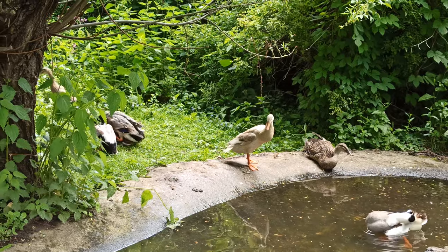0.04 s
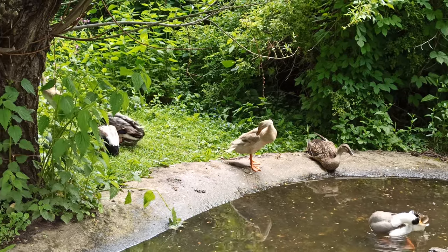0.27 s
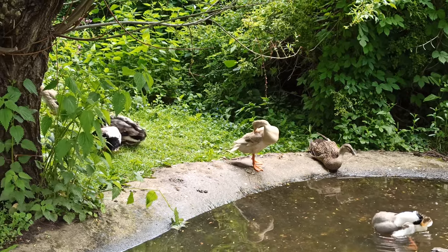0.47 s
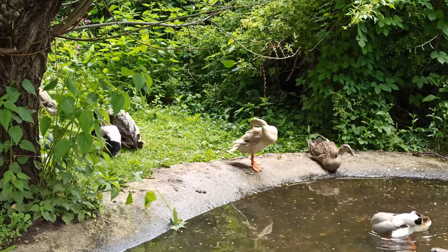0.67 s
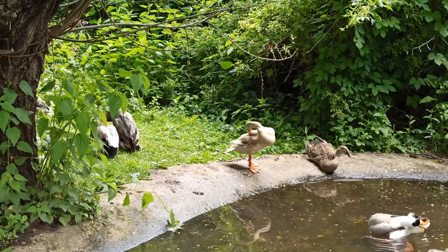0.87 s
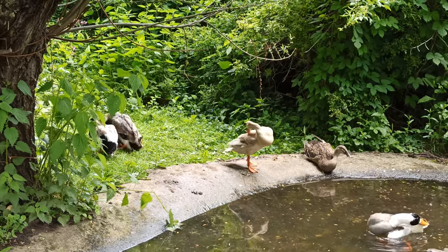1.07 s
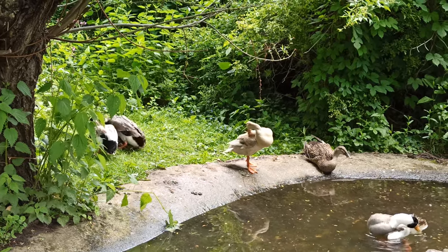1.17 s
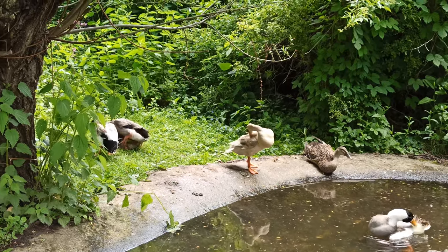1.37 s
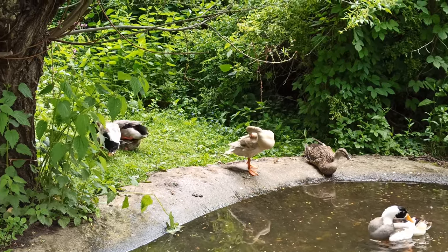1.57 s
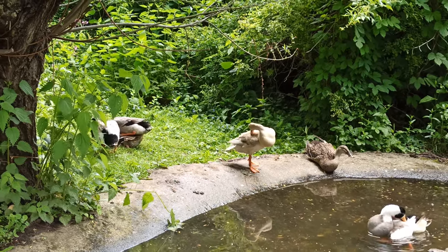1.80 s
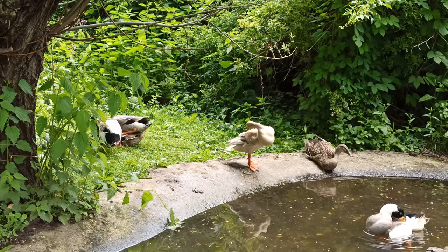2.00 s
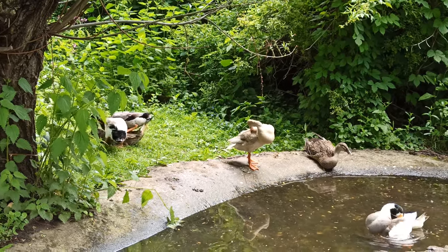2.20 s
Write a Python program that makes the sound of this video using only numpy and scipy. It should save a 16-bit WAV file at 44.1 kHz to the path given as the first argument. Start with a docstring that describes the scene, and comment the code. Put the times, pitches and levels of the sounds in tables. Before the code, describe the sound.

A duck gives one loud, nasal quack by a pond while small birds whistle thinly.

```python
"""A duck beside a garden pond gives one loud quack and three soft clucks: pulses ring throat and bill resonances.
The quack opens from a low rattle into a nasal blare; another duck is heard only through the bushes.
Small birds whistle and chirp as wavering sine tones; water ticks, as ducks preen, are bursts of narrow noise.
Puffs of air push the left microphone port, foliage, ground and trees echo the duck as diffuse noise tails,
and filtered noise makes the quiet outdoor background."""
import sys
import numpy as np
from scipy import signal
from scipy.fft import rfft, irfft, next_fast_len
from scipy.io import wavfile
from scipy.ndimage import map_coordinates

SR = 44100
rng = np.random.default_rng(int(sys.argv[2]) if len(sys.argv) > 2 else 0)


def put_to_file(sound):
    """Save the sound as 16-bit audio at rate SR, in the file named by the first command-line argument."""
    columns = np.atleast_2d(sound).T  # one column per channel
    safe = np.clip(columns, -1, 1)
    whole_steps = np.round(safe * 32767)
    wavfile.write(sys.argv[1], SR, whole_steps.astype(np.int16))


N = 99225
NEAR_T60_S = 0.16  # decay of the echo from close by


def amp(db):
    """Decibels to gain."""
    return 10 ** (np.asarray(db) / 20)


def unit(x):
    """Scale to rms 1."""
    return x / np.sqrt(np.mean(x ** 2) + 1e-20)


def clock():
    """Time of each sample in seconds."""
    return np.arange(N) / SR


def along(points, hz):
    """Read (Hz, value) points on a logarithmic frequency axis."""
    point_hz, value = np.transpose(points)
    return np.interp(np.log(hz + 1), np.log(point_hz + 1), value)


def curves(rows):
    """One value per sample for each column after the time."""
    time_s, *columns = np.transpose(rows)
    return [np.interp(clock(), time_s, column) for column in columns]


def wobble(rate):
    """A smooth random curve, rate knots a second."""
    knots = rng.standard_normal(int(N * rate / SR) + 4)
    return map_coordinates(knots, [clock() * rate])


def filtered(x, response):
    """Multiply the spectrum of x by a complex response of frequency."""
    size = next_fast_len(N + SR // 2)
    hz = np.fft.rfftfreq(size, 1 / SR)
    return irfft(rfft(x, size) * response(hz), size)[..., :N]


def noise(spectrum):
    """Coloured noise of rms 1."""
    return unit(filtered(rng.standard_normal(N), lambda hz: amp(along(spectrum, hz))))


def panned(x, db):
    """Stereo with a left-right level difference."""
    return x * amp(np.array([[db], [-db]]) / 2)


def throat(x, spectrum, size=2048):
    """Ring x through a causal minimum-phase filter of unit energy."""
    log_gain = np.log(amp(along(spectrum, np.fft.rfftfreq(size, 1 / SR))))
    cepstrum = irfft(log_gain)
    cepstrum[1:size // 2] *= 2  # fold the backward half forward in time
    cepstrum[size // 2 + 1:] = 0
    ring = irfft(np.exp(rfft(cepstrum)))
    return signal.fftconvolve(x, ring / np.linalg.norm(ring))[:N]


def pulses(cycles, rough):
    """One pulse per whole cycle, rms near 1; roughness scatters them and accents every third."""
    scatter_db, accent_db, jitter_s = 0.9, 8.5, 0.00013  # each at roughness 1
    at = np.flatnonzero(np.diff(np.floor(cycles)) > 0)
    chance = rng.standard_normal((len(at), 2))
    third = np.resize([1, 0, 0], len(at))
    uneven_db = scatter_db * chance[:, 0] + accent_db * (third - third.mean())
    size = amp(rough[at] * uneven_db) / np.sqrt(np.diff(cycles)[at])  # equal power at any rate
    shifted = np.round(at + jitter_s * SR * rough[at] * chance[:, 1])
    return np.bincount(np.clip(shifted, 0, N - 1).astype(int), size, N)


def echo(x, t60s):
    """A diffuse stereo tail, 4 ms late, in which each frequency dies at its own speed."""
    hz, t, grains = signal.stft(rng.standard_normal((2, SR)), SR, nperseg=256)
    fading = grains * amp(-60 * t / along(t60s, hz)[:, None])
    tail = signal.istft(fading, SR, nperseg=256)[1]
    late = np.pad(np.atleast_2d(x), ((0, 0), (SR // 250, 0)))
    return signal.fftconvolve(late, tail / np.linalg.norm(tail[0]), axes=1)[:, :N]


def background(pan_db=-0.5, hiss_db=-65.5, hiss_pan_db=-7):
    """A low outdoor rush of air and leaves that eases a little, with thin hiss on top."""
    # colour of the rush: pitch_hz, relative_db
    air_colour = [(15, -64), (25, -18), (108, 3), (198, -6), (431, -11), (550, -15), (832, -12.5),
                  (1010, -19.5), (3020, -26), (3950, -23.5), (5200, -31), (8400, -24), (18500, -120)]
    # how alike the two ports hear it: pitch_hz, likeness (1 the same, 0 unrelated)
    air_likeness = [(60, 1), (400, 0.41), (5000, 0.028)]
    # level of the rush: time_s, level_db
    air_level = [(0, -47), (1.6, -51.5)]
    spread = lambda hz: np.arccos(np.clip(along(air_likeness, hz), -1, 1)) / 2
    mid, side = filtered(
        np.array([noise(air_colour), noise(air_colour)]),
        lambda hz: np.array([np.cos(spread(hz)), np.sin(spread(hz))]))
    air = unit(np.array([mid + side, mid - side])) * amp(curves(air_level)[0])
    hiss = amp(hiss_db) * rng.standard_normal((2, N))
    return panned(air, pan_db) + panned(hiss, hiss_pan_db)


def puffs():
    """Each puff of air is one low push on the left port alone; weaker puffs are duller."""
    # puffs before the low cut: centre_s, peak_db
    puff_times = [(0.576, -31), (.601, -33), (0.645, -24.5), (0.665, -30.5), (.686, -26), (1.3, -28),
                  (1.363, -31.5), (1.649, -31), (1.681, -28), (1.774, -21), (1.946, -32.5), (1.984, -26.5),
                  (2.036, -30.5)]
    full_scale_hz, hz_per_db, width_cycles = 193.6, 3.5, 0.53
    t, left = clock(), np.zeros(N)
    for centre_s, db in puff_times:
        cycles = (t - centre_s) * (full_scale_hz + hz_per_db * db)
        push = np.exp(-(cycles / width_cycles) ** 2) * np.cos(2 * np.pi * cycles)
        left -= amp(db) * push
    return np.array([left, np.zeros(N)])


def water(tick_width=0.21, splash_width=0.2, pan_db=-3, wet_db=-10):
    """Sharp ticks and small splashes: bursts of narrow noise that die away exponentially."""
    # water ticks: start_s, level_db, pitch_hz, t60_s
    tick_rows = [(.16, -29.5, 8570, 0.0076), (1.083, -46, 6700, 0.0096), (1.492, -53, 12000, .006),
                 (1.792, -60, 13600, .11)]
    # small splashes: start_s, level_db, pitch_hz
    splash_rows = [(1.794, -54.5, 2240), (1.81, -57.5, 2460), (1.882, -59, 2820)]
    splash_t60_s = 0.13

    def burst(start_s, db, hz, t60_s, width):
        """Noise in a bell-shaped band, its width in natural-log frequency."""
        age = clock() - start_s
        band = lambda f: np.exp(-(np.log((f + 1) / hz) / width) ** 2)
        ring = unit(filtered(rng.standard_normal(N), band))
        return ring * (age > 0) * amp(db) * np.exp(-np.log(1000) * abs(age) / t60_s)

    ticks = sum(burst(*row, tick_width) for row in tick_rows)
    splashes = sum(burst(*row, splash_t60_s, splash_width) for row in splash_rows)
    out = ticks + splashes
    return panned(out + amp(wet_db) * echo(out, [(4000, 0.75)]), pan_db)


def chirps(wet_db=-3, waver=0.0375, flutter_db=3):
    """A second bird repeats one short arched note, a sine of unsteady pitch and level."""
    # the chirps: start_s, level_db, left_minus_right_db
    chirp_times = [(0.979, -46, -5.5), (1.968, -52.5, -8.5)]
    # the arch of one chirp: age_s, pitch_hz, relative_db
    chirp_arch = [(0, 3500, -12), (.006, 4040, -2.5), (.019, 4450, -8), (.026, 3800, -1.5),
                  (.034, 3630, -6.5), (.043, 2950, -20), (.052, 3250, -7), (.07, 3340, -13)]
    t, out = clock(), np.zeros((2, N))
    age_s, pitch_hz, shape_db = np.transpose(chirp_arch)
    for start_s, db, pan_db in chirp_times:
        hz = np.interp(t - start_s, age_s, pitch_hz) * (1 + waver * wobble(400))
        level_db = db + np.interp(t - start_s, age_s, shape_db) + flutter_db * wobble(250)
        sounding = (t > start_s) * (t < start_s + age_s[-1])
        tone = np.sin(2 * np.pi * np.cumsum(hz) / SR)
        out += panned(amp(level_db) * sounding * tone, pan_db)
    return out + amp(wet_db) * echo(out, [(4000, 0.37)])


def whistles(waver=0.012, flutter_db=3, pan_db=-1.5):
    """Wavering sine notes, most of them very high and falling, scattered by the leaves; one faint rising note
    belongs to the distant duck."""
    # thin whistles, plus one faint rising note of the distant duck at 1.445 s, before scattering: start_s,
    # length_s, first_hz, last_hz, level_db
    whistle_notes = [(0.173, 0.081, 7300, 6850, -47.5), (0.221, 0.069, 8310, 7560, -50.5),
                     (.32, 0.14, 6840, 6800, -42.5), (0.405, 0.019, 8240, 7600, -50),
                     (0.409, .075, 7650, 7280, -39), (0.399, 0.05, 6510, 6205, -39.5),
                     (0.472, 0.062, 6940, 6410, -50), (0.594, 0.064, 8390, 6180, -48),
                     (0.597, 0.054, 6780, 5640, -48.5), (0.613, .026, 7570, 7400, -44.5),
                     (0.635, .035, 6850, 6340, -47.5), (.64, 0.073, 1420, 1414, -54),
                     (1.445, 0.076, 2580, 2810, -71), (1.562, 0.075, 3110, 3090, -71),
                     (1.485, 0.18, 8370, 7230, -62.5), (1.5, 0.11, 7310, 6520, -58),
                     (1.679, 0.11, 8100, 7240, -59), (1.694, 0.093, 6980, 6250, -54),
                     (1.847, 0.079, 7950, 7150, -60), (1.855, .065, 7080, 6250, -56)]
    # echo of the whistles, later notes coming from deeper in the bushes: time_s, echo_db
    whistle_depth = [(.6, -7), (1.5, 4)]
    t, out = clock(), np.zeros(N)
    for start_s, length_s, first_hz, last_hz, db in whistle_notes:
        progress = np.clip((t - start_s) / length_s, 0, 1)
        hz = (first_hz + (last_hz - first_hz) * progress) * (1 + waver * wobble(350))
        swell = np.sqrt(abs(np.sin(np.pi * progress)))
        level = amp(db + flutter_db * wobble(110)) * swell
        out += level * np.sin(2 * np.pi * np.cumsum(hz) / SR)
    scattered = (out + echo(out, [(7000, NEAR_T60_S / 2)])) / np.sqrt(2)
    deep = echo(out * amp(curves(whistle_depth)[0]), [(7000, 1.0)])
    return panned(scattered + deep, pan_db)


def clucks(calls, resonances, rough=0.69):
    """Short soft rattles: pulses that swell and fade, ringing the throat."""
    t, drive = clock(), np.zeros(N)
    for centre_s, half_s, db, hz in calls:
        swell = np.cos(np.pi / 2 * np.clip((t - centre_s) / half_s, -1, 1)) ** 2
        drive += pulses(t * hz, np.full(N, rough)) * amp(db) * swell
    return throat(drive, resonances)


def far_duck():
    """Another duck, heard only through the bushes: its echo without the direct sound."""
    # distant calls: centre_s, half_length_s, level_db, pulse_rate_hz
    far_calls = [(.07, 0.079, -58, 215.8), (1.44, 0.074, -59.5, 242.4)]
    # resonances of the distant duck: pitch_hz, relative_db
    far_throat = [(900, -18), (2100, 5), (3800, -35)]
    return echo(clucks(far_calls, far_throat), [(1000, NEAR_T60_S)])


def quack():
    """Pulses speed up and swell; the opening bill shifts resonances upward and a second vibration joins in."""
    # rate of the voice pulses: time_s, pulse_rate_hz
    pulse_rate = [(.176, 140), (.197, 152), (.232, 195), (.241, 140), (.251, 250), (.29, 267), (.33, 280),
                  (.355, 289), (.42, 286)]
    # level of the pulse drive: time_s, level_db
    quack_level = [(.172, -45), (.2, -39), (.216, -35), (.25, -33), (.292, -33), (.335, -32), (.366, -25.5),
                   (.382, -30), (.394, -27.5), (.413, -28), (.427, -40.5)]
    # the bill: time_s, opening (0 shut, 1 ajar, 2 half, 3 and above wide), roughness (0-1)
    bill_motion = [(.19, .1, .15), (.225, 0.94, 0.19), (.245, 1.3, 0.43), (.26, 1.85, 0.16),
                   (.3, 1.8, 0.85), (.33, 3.3, 1), (.35, 3.42, 0.33)]
    # throat and bill resonances at four openings, each: pitch_hz, relative_db
    shut = [(120, -34), (330, -2), (560, -19), (1050, 8.5), (1400, -4.5), (2200, -26), (3000, -31),
            (6000, -40)]
    ajar = [(120, -39.5), (350, -4), (540, -22), (850, 6.5), (1100, 0), (1400, 10.5), (1800, -9.5),
            (3000, -29), (6000, -41)]
    half_open = [(150, -40), (300, -2), (520, -14.5), (800, -14), (980, 6), (1200, -10), (1450, 12.5),
                 (1750, -7), (2020, 0.5), (2450, -8.5), (3000, -36.5), (4150, 1), (5000, -41)]
    wide_open = [(150, -33), (300, -17), (800, -22.5), (1040, -11), (1240, -12.5), (1500, 0), (1820, -3),
                 (2060, 5), (2400, -13), (2950, -27), (5100, -41), (6800, -22.5), (9000, -44)]
    # colour of the air gated by the pulses: pitch_hz, relative_db
    rasp_colour = [(300, -14.5), (900, -1.5), (2100, 15), (3000, -10), (4150, 2.5), (5100, -11),
                   (6700, -2.5), (8300, -11.5), (12000, -47)]
    # second vibration in the voice box, chopped by the pulses: time_s, pitch_hz, relative_db
    second_voice = [(.265, 945, -13), (.283, 955, -1), (.33, 1024, 2), (.35, 1025, -12.5)]
    rasp_db, fundamental_db, overtone_waver = 0.5, -12.5, 0.018

    t = clock()
    (hz,), (db,), (bill, rough) = curves(pulse_rate), curves(quack_level), curves(bill_motion)
    sounding = (t > quack_level[0][0]) & (t < quack_level[-1][0])
    cycles = np.cumsum(hz * sounding) / SR + 0.5
    level = amp(db) * sounding
    drive = pulses(cycles, rough) * level
    voice = np.zeros(N)
    for opening, shape in enumerate([shut, ajar, half_open, wide_open]):
        share = np.clip(1 - abs(np.clip(bill, 0, 3) - opening), 0, 1)  # crossfade neighbours
        voice += throat(drive * share, shape)
    opened = np.clip(bill - 1, 0, 1)
    gate = 0.5 + 0.5 * np.cos(2 * np.pi * (cycles - 0.25))
    breath = rng.standard_normal(N) * gate ** 2 * level * (0.35 + opened)
    rasp = throat(breath, rasp_colour)
    overtone_hz, overtone_db = curves(second_voice)
    turn = 2 * np.pi * np.cumsum(overtone_hz * (1 + overtone_waver * wobble(119.94))) / SR
    overtone = (1 + gate) / 2 * amp(overtone_db) * np.sin(turn)
    fundamental = amp(fundamental_db) * np.cos(2 * np.pi * cycles)  # the clean lowest partial
    tones = opened * level * np.sqrt(2) * (overtone + fundamental)
    return voice + amp(rasp_db) * rasp + tones


def duck():
    """The duck stands to the left; ground answers at once, leaves scatter its treble, trees and bank answer later."""
    # soft clucks: centre_s, half_length_s, level_db, pulse_rate_hz
    cluck_calls = [(0.112, 0.035, -49, 174.6), (1.07, 0.04, -50, 187.8), (1.303, 0.036, -47.5, 187.5)]
    # throat resonances of the clucks: pitch_hz, relative_db
    cluck_throat = [(150, -30.5), (370, 3.5), (520, -10.5), (950, -8.5), (1300, 3.5), (1550, 5.5),
                    (1850, -17), (2300, -11), (3500, -30)]
    # level difference between the ports: pitch_hz, left_minus_right_db
    port_level = [(600, -1.5), (1300, 2.5), (2300, 7), (4400, -8), (12000, 5)]
    # phase by which the left port leads: pitch_hz, lead_radians
    port_phase = [(300, 0.054), (1200, 1.27), (2400, 0.94), (4200, 1.85)]
    # treble thrown back by the foliage: pitch_hz, gain_db
    foliage = [(2600, -28), (3900, -1), (6000, 0)]
    # decay of the answer from the trees: pitch_hz, t60_s
    tree_decay = [(1500, 1), (8000, 1), (14000, 0.24)]
    leaves_delay_s, leaves_pan_db = 0.014, -6.5
    bank_delay_s, bank_db, bank_top_hz = 0.38, -30.5, 1900  # a dull late answer from the far bank
    ground_db, trees_db = -11, -21.5

    voice = quack() + clucks(cluck_calls, cluck_throat)
    side = np.array([[0.5], [-0.5]])
    direct = filtered(voice, lambda hz: amp(side * along(port_level, hz))
                      * np.exp(1j * side * along(port_phase, hz)))
    delay = lambda hz, seconds: np.exp(-2j * np.pi * hz * seconds)
    treble = filtered(voice, lambda hz: amp(along(foliage, hz)) * delay(hz, leaves_delay_s))
    leaves = panned(echo(treble, [(4000, NEAR_T60_S)]), leaves_pan_db)
    dull = filtered(voice, lambda hz: delay(hz, bank_delay_s) / (1 + (hz / bank_top_hz) ** 8))
    bank = amp(bank_db) * echo(dull, [(1000, NEAR_T60_S)])
    ground = amp(ground_db) * echo(voice, [(1000, NEAR_T60_S)])
    trees = amp(trees_db) * echo(voice, tree_decay)
    return direct + leaves + bank + ground + trees


def scene():
    """Everything around the pond."""
    return duck() + far_duck() + whistles() + chirps() + water() + puffs() + background()


def record(dry):
    """The microphone's low cut, treble notch and band limit."""
    # the microphone's deep treble notch: pitch_hz, gain_db
    treble_notch = [(8350, 0.5), (8600, -5.5), (9000, -21.5), (10000, -22.5), (11350, -26), (11600, 3.5)]
    low_cut_hz, top_hz = 79, 15850
    low_cut = lambda hz: hz ** 2 / np.hypot(hz ** 2, low_cut_hz ** 2)
    return filtered(dry, lambda hz: amp(along(treble_notch, hz)) * low_cut(hz) * (hz < top_hz))


dry = scene()
out = record(dry)
put_to_file(out)
```